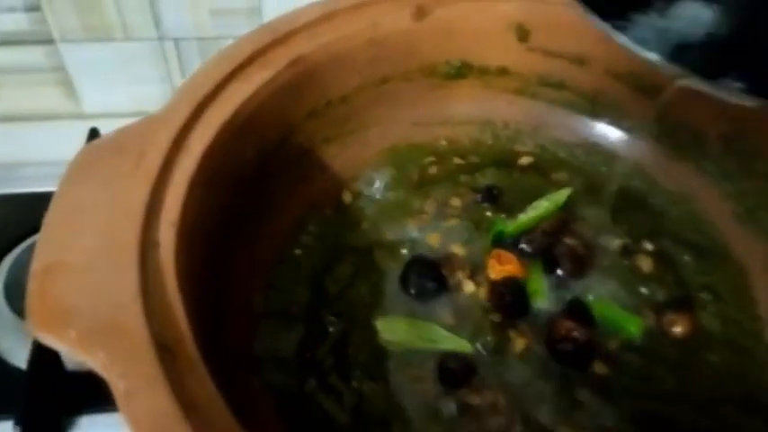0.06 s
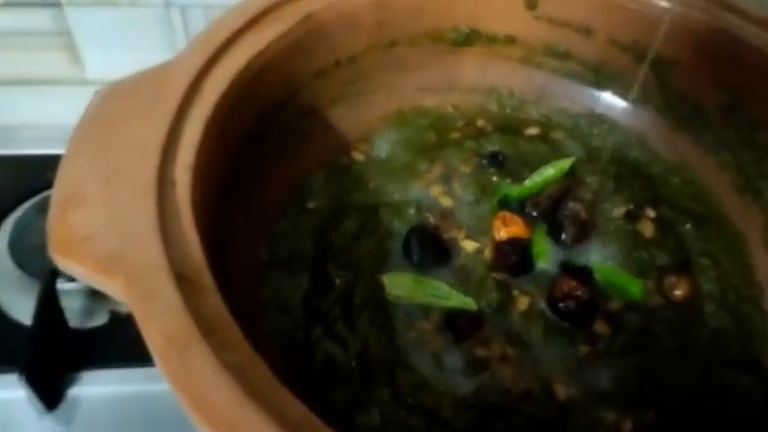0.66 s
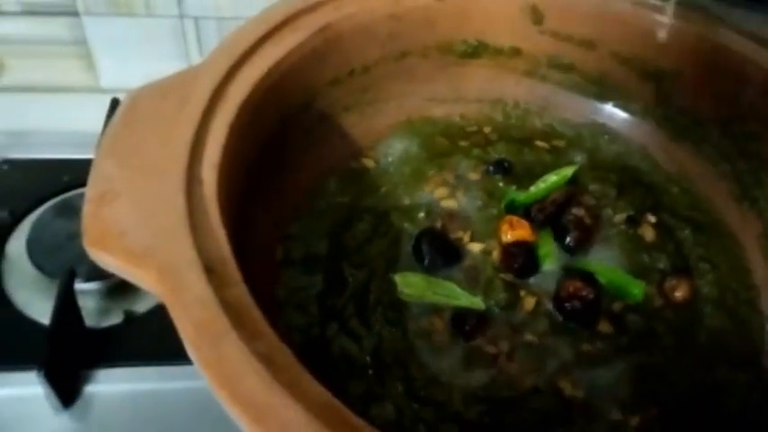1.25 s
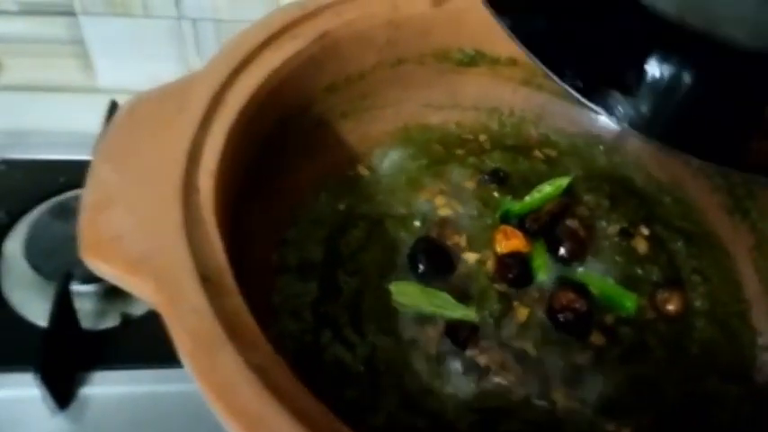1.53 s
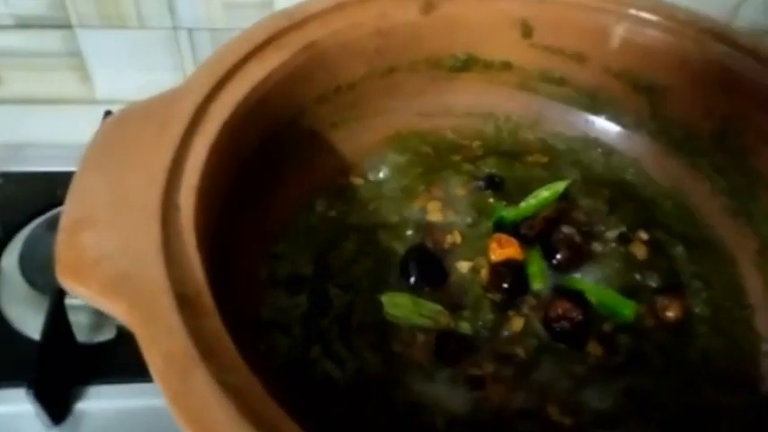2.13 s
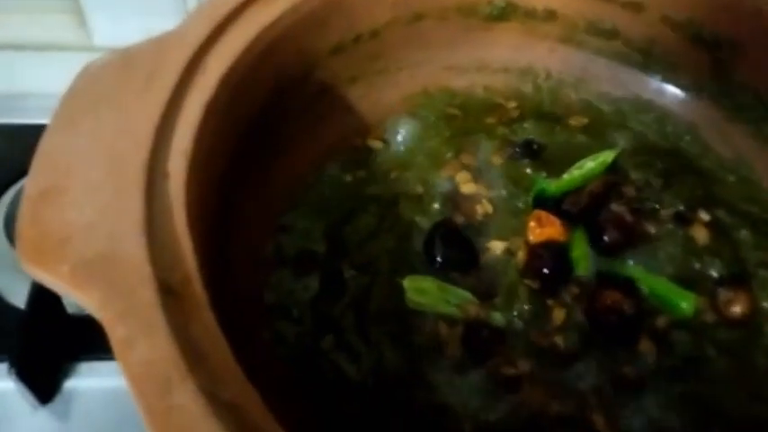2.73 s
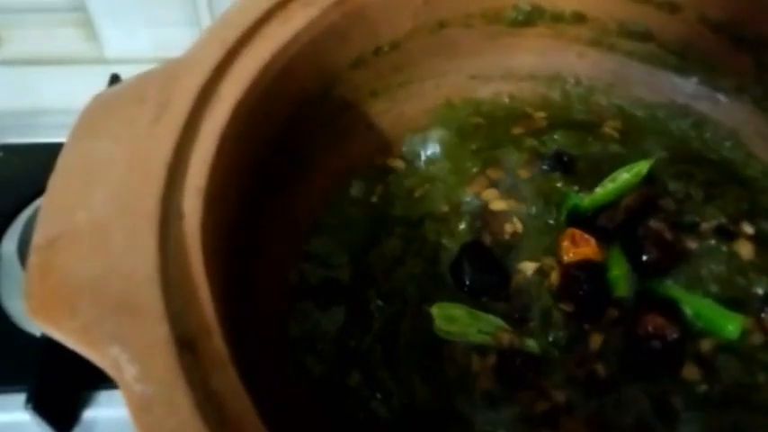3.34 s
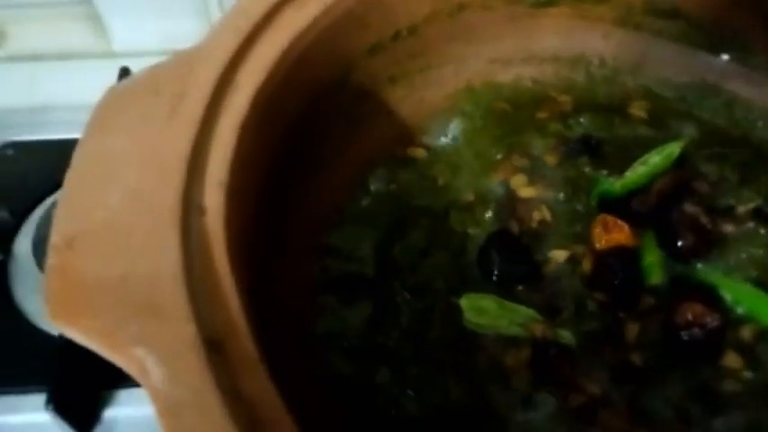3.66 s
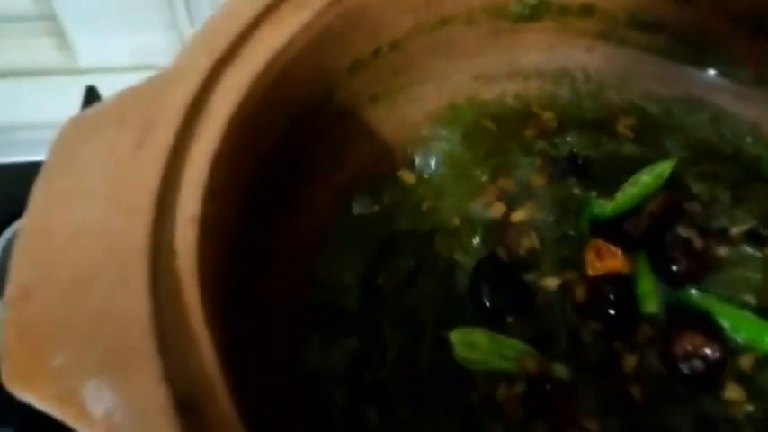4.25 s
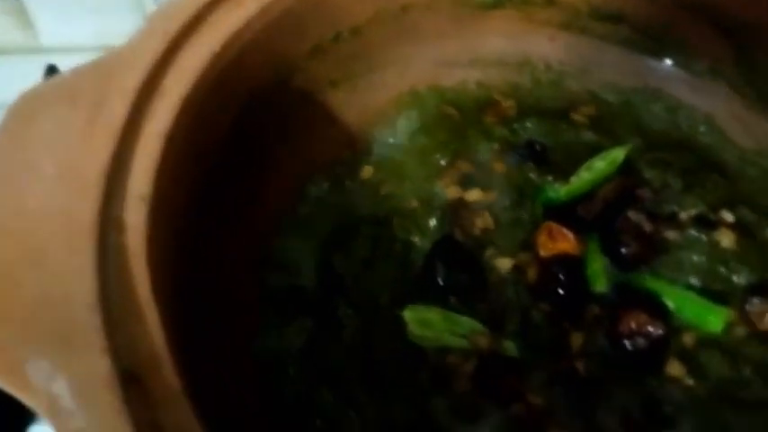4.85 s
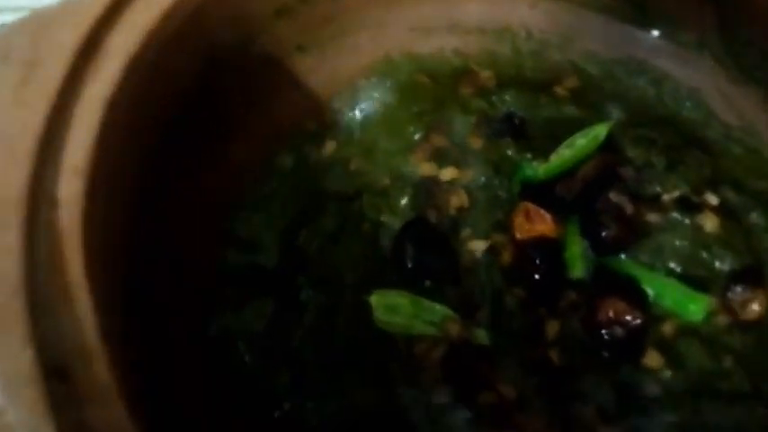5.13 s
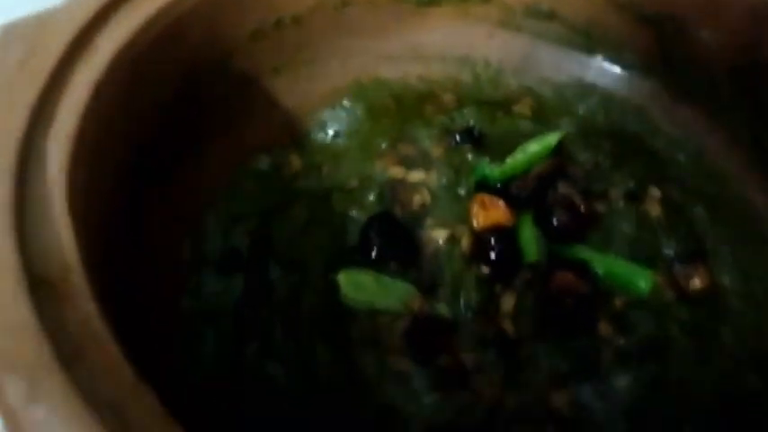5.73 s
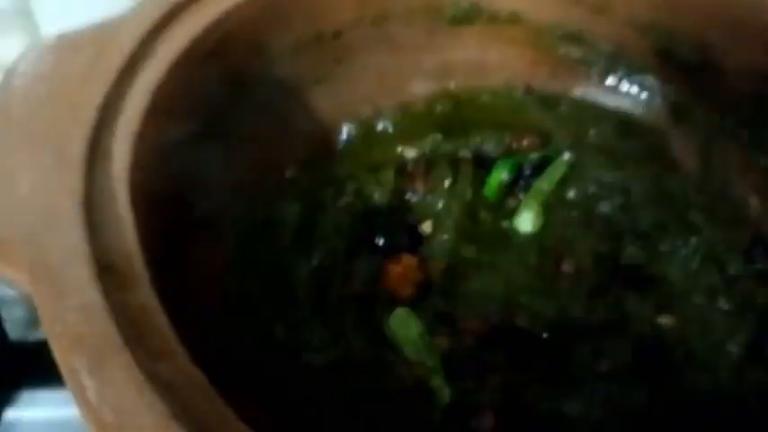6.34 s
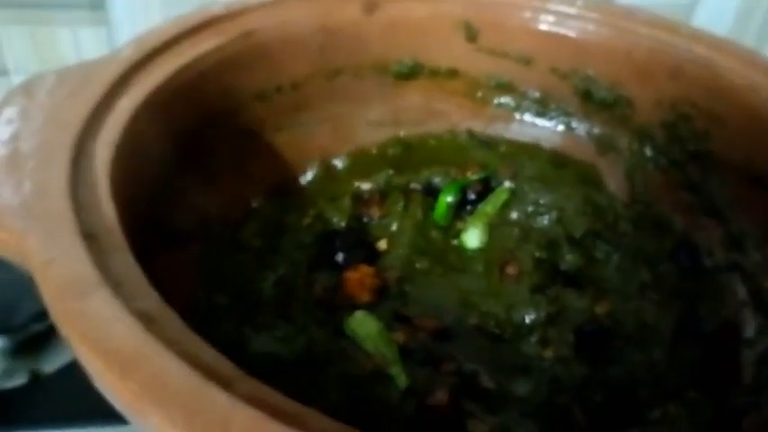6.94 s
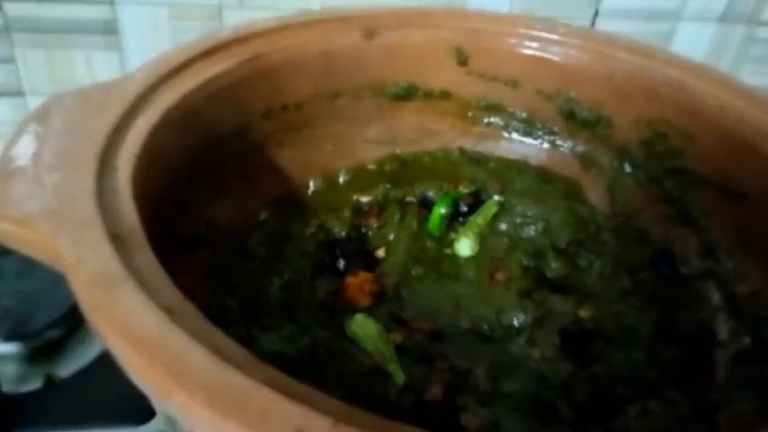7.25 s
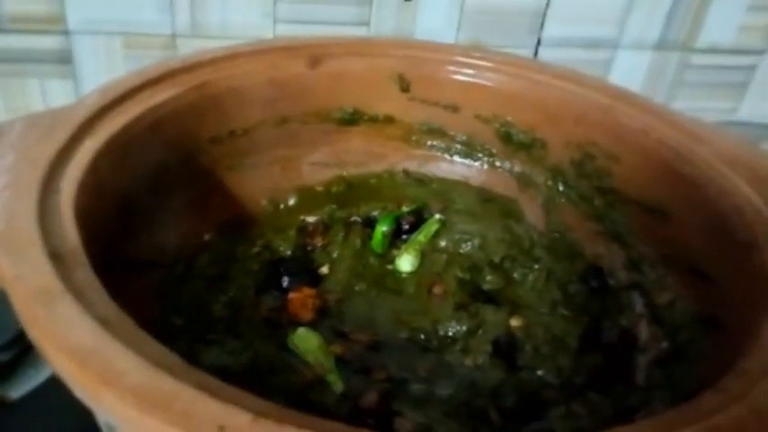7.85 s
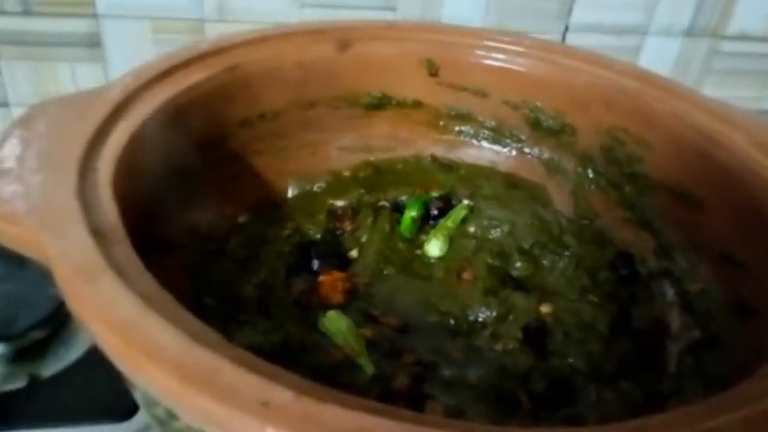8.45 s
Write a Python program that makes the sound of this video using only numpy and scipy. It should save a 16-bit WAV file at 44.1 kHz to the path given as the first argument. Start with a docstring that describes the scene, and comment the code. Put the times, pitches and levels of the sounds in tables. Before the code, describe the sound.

Hot oil sizzles on greens in a clay pot, with sharp spits and small popping bubbles, gradually weakening. About three seconds in, a metal pan clanks loudly onto the stove grate and rattles to rest. A sharp tap and a faint, brief creak follow. The sizzle then stops abruptly, leaving a few tiny pops over a low hum and faint electrical ticking, heard close in a small kitchen.

```python
"""A small, hard-walled kitchen with a steady hum and a faint electrical ticking.
Hot spiced oil, just poured on greens in a clay pot, sizzles as water flashes to steam: bubbles ring
and pop, drops spit, and all weaken as the oil cools. The emptied pan is set down on the stove, where
impacts excite its modes as it rocks; something small taps, and the pan creaks by stick-slip friction.
The sizzle stops abruptly, leaving lone bubbles and spits over the hum and the ticking."""
import sys
import numpy as np
from scipy import signal
from scipy.fft import rfft, irfft
from scipy.io import wavfile
from scipy.ndimage import uniform_filter1d

SR = 44100
rng = np.random.default_rng(int(sys.argv[2]) if len(sys.argv) > 2 else 0)


def store_pcm(level_fs):
    """Save levels as 16-bit WAV."""
    pcm = np.round(np.clip(level_fs, -1, 1) * 32767).astype(np.int16)
    wavfile.write(sys.argv[1], SR, np.atleast_2d(pcm).T)


N = 383669
TIME = np.arange(N) / SR
SIZZLE_END_S = 6.372


def undb(db):
    """Decibels to amplitude ratio."""
    return 10 ** (np.asarray(db) / 20)


def unit(x):
    """Normalise to rms 1."""
    return x / np.sqrt(np.mean(x ** 2))


def peak(x):
    """Normalise to peak 1."""
    return x / np.abs(x).max()


def add(out, s, sound):
    """Superpose a sound, starting at s seconds."""
    i = int(s * SR)
    out[i:i + len(sound)] += sound[:N - i]


def colour(x, points, size=8192):
    """Minimum-phase filter through (Hz, dB) points, by folding the cepstrum."""
    hz, db = np.transpose(points)
    bin_hz = np.arange(size // 2 + 1) * SR / size
    log_gain = np.log(undb(np.interp(np.log(bin_hz + 1), np.log(hz), db)))
    cepstrum = irfft(log_gain)
    cepstrum[1:size // 2] *= 2
    cepstrum[size // 2 + 1:] = 0
    return signal.oaconvolve(x, irfft(np.exp(rfft(cepstrum))))[:len(x)]


def band(x, hz, width):
    """Second-order resonator with gain 1 at its centre."""
    return signal.lfilter(*signal.iirpeak(hz, hz / min(width, SR / 4), fs=SR), x)


def walk(rate):
    """Random modulation: ramps between values drawn at a rate per second; rms 1."""
    hold = max(int(SR / rate), 1)
    steps = np.repeat(rng.standard_normal(N // hold + 1), hold)
    return unit(uniform_filter1d(steps, hold)[:N])


def clicks(rate, spread_db):
    """Shot noise: random impulses of unequal size at a rate per second; rms 1 however sparse."""
    chance = np.clip(rate / SR, 1 / SR, 1)
    sizes = undb(spread_db * np.clip(rng.standard_normal(N), -2.5, 2.5))
    return unit((rng.random(N) < chance) * sizes * rng.choice([-1, 1], N) / np.sqrt(chance))


def burst(t, t60):
    """Exponentially damped noise, falling 60 dB in t60 seconds."""
    return rng.standard_normal(len(t)) * undb(-60 * t / t60)


def chance_events(rate, length_s):
    """Jittered events. Each row: start in seconds, then size and pitch deviations of variance 1."""
    draws = rng.random((int(rate * length_s), 3))
    starts = (np.arange(len(draws)) + draws[:, 0]) / rate
    return np.column_stack([starts, np.sqrt(12) * (draws[:, 1:] - .5)])


def room(x, wet_db, early_db, late_t60=.56, early_t60=.04):
    """Reverberation: early reflections from pot and tiles, then the kitchen's diffuse tail."""
    t = TIME[:int(.8 * SR)]
    late, early = rng.standard_normal((2, len(t))) * (t > .0015)
    late *= undb(-60 * t / late_t60) * np.minimum(t / .015, 1)
    late = colour(late, [(300, -4.5), (5000, -3), (14000, -3)])
    early *= undb(-60 * t / early_t60)
    response = (undb(wet_db) * unit(late) + undb(early_db) * unit(early)) / np.sqrt(len(t))
    return x + signal.oaconvolve(x, response)[:N]


# Spectrum of the room noise. Each row: frequency in Hz, relative level in dB.
AMBIENT_SPECTRUM = [(20, -1), (70, -5), (160, -14), (290, -15), (350, -18.5), (500, -10), (650, -21.5),
                    (1000, -21), (2200, -27.5), (2900, -25.5), (4500, -30.5), (9500, -34.5), (15500, -35.5)]
# Tones of the hum. Each row: mean frequency in Hz, mean rms level in dB.
HUM_TONES = [(97, -69), (145, -71.5), (474, -72.5), (576, -73)]


def kitchen():
    """Ambient noise, with a hum that wavers by random frequency and amplitude modulation."""
    out = unit(colour(rng.standard_normal(N), AMBIENT_SPECTRUM)) * undb(-57 + .5 * walk(5))
    for hz, db in HUM_TONES:
        gain = undb(db + 2 * walk(6))
        phase = 2 * np.pi * np.cumsum(hz * (1 + .00617 * walk(11))) / SR
        out += gain * unit(np.sin(phase))
    return out


def draught(gust_s=4.3, half_width_s=.31):
    """Turbulent pressure of air nudging the microphone: a low rumble with one gust."""
    rumble = unit(colour(rng.standard_normal(N), [(12, .5), (35, -5), (70, -24.5), (300, -61.5)]))
    gust = np.exp(-((TIME - gust_s) / half_width_s) ** 2)
    return rumble * undb(-56.5 + 11.5 * gust + 2 * walk(2.99))


def ticking(period_s=1 / 30):
    """Electrical pickup: a pulse train of spikes with a high fizz, and weaker spikes midway."""
    out = np.zeros(N)
    spike = peak(signal.windows.hann(5))
    for s in np.arange(.0188, N / SR - period_s, period_s):
        fizz = unit(band(rng.standard_normal(SR // 1000), hz=11000, width=3000))
        add(out, s, undb(-41.5) * spike)
        add(out, s, undb(-55) * fizz)
        add(out, s + period_s / 2, undb(-52.5) * spike)
    return out


# A utensil's impact: start in seconds, peak level in dB.
TAP_IMPACT = (4.1548, -13)
# Spectrum of the impact. Each row: frequency in Hz, relative level in dB.
TAP_SPECTRUM = [(100, -4), (300, 3), (550, -5), (800, -1), (1000, -7), (1400, 2.5), (2400, -8), (4200, -5),
                (5800, -3), (8500, -9), (12000, -9), (15500, -15)]


def tap():
    """Heavily damped impact: something small and hard is put down, and the room answers."""
    out = np.zeros(N)
    s, db = TAP_IMPACT
    add(out, s, undb(db) * peak(colour(burst(TIME[:SR // 10], t60=.046), TAP_SPECTRUM)))
    return room(out, wet_db=-4.5, early_db=-5)


# The pan's slide on the grate: start in seconds, slips per second, peak level in dB.
PAN_SLIDE = (4.9875, 306, -33)


def creak():
    """Stick-slip friction: the pan moves on the grate in a few uneven jerks that soon die out."""
    out, t = np.zeros(N), TIME[:SR // 10]
    s, rate, db = PAN_SLIDE
    cycles = np.cumsum(rate * (1 + .05 * walk(300)[:len(t)])) / SR
    slips = np.diff(np.floor(cycles), prepend=-1) + .067 * rng.standard_normal(len(t))
    slips *= np.exp(-(t / .024) ** 2)
    body = [(150, -27), (300, 5), (430, -11), (600, -.5), (1200, -6), (2500, -27), (6000, -45)]
    add(out, s, undb(db) * peak(colour(slips, body)))
    return room(out, wet_db=-8, early_db=-12)


def ring(modes, t):
    """Modal superposition: damped sinusoids, successive pairs in opposite phase; peak 1."""
    return peak(sum((-1) ** (k // 2) * undb(db - 60 * t / t60) * np.sin(2 * np.pi * hz * t)
                    for k, (hz, db, t60) in enumerate(modes)))


# Impacts of pan on grate. Each row: start in seconds, ring level in dB, clank level in dB,
# treble tilt of the clank in dB per octave.
PAN_IMPACTS = [(3.1302, -3.5, -5.5, -2.5), (3.319, -42, -15, 3), (3.352, -42.5, -21, 2.5),
               (3.373, -18.5, -17, -16), (3.391, -22.5, -25, -15), (3.4437, -28, -4, 0.5),
               (3.45, -21.5, -15, 0.5), (3.463, -20.5, -12, 2), (3.572, -42, -13, -0.5),
               (3.641, -48, -20.5, 0.5), (3.685, -59, -21, -2)]
# Modes of pan and grate. Each row: frequency in Hz, relative level in dB, 60 dB decay time in seconds.
PAN_MODES = [(540, -19, .07), (715, -20, .08), (850, -25, .05), (1063, -19, .15), (1114, -21, .15),
             (1293, 0, .115), (1297, -18, .35), (1491, -26, .2), (1783, -30, .15), (2420, -27, .33),
             (2492, -29, .1), (3490, -37, .15)]
GRATE_MODES = [(531, -18, 0.12), (1392, -10, .09), (1590, 1, .06), (1685, -4.5, 0.086), (1904, -6.5, .09),
               (1953, -6.5, .11), (2100, -7, .11), (2300, -9.5, 0.11), (3224, -10.5, 0.11),
               (3760, -15.5, 0.095), (4810, -14.5, .05), (5230, -18, .06), (6390, -24, 0.0599),
               (7300, -23, .05)]
# Spectrum of the crack of contact. Each row: frequency in Hz, relative level in dB.
CONTACT_SPECTRUM = [(60, -13), (240, -14), (330, -13), (550, -4), (700, -8.5), (900, -13.5), (1500, 6.5),
                    (2100, -0.5), (2900, -8), (4300, -12.5), (5200, -10), (8000, -20.5), (15000, -32.5)]


def pan():
    """Free vibration after impact: pan and grate ring as the pan lands, tips and rocks to rest."""
    out, t = np.zeros(N), TIME[:SR // 2]
    for s, ring_db, clank_db, tilt in PAN_IMPACTS:
        crack = peak(colour(burst(t, t60=.041), CONTACT_SPECTRUM))
        # harder contact tips the clank towards the treble
        clank = colour(ring(GRATE_MODES, t) + crack, [(1500, .0096), (12000, 3 * tilt)])
        add(out, s, undb(ring_db) * ring(PAN_MODES, t) + undb(clank_db) * peak(clank))
    return room(out, wet_db=-5.5, early_db=-17)


def stove(t60=1.0):
    """Plate vibration: each landing feeds energy to the sheet-metal top, which booms dully."""
    energy = np.zeros(N)
    for s, _, clank_db, _ in PAN_IMPACTS:
        add(energy, s, undb(clank_db - 60 * TIME[:SR] / t60) ** 2)
    plate = [(40, -11), (65, 0), (83, 3.5), (120, -8.5), (168, 1.5), (240, -16.5), (330, .5),
             (700, -32), (2000, -58.5)]
    return undb(-33.5) * np.sqrt(energy) * unit(colour(rng.standard_normal(N), plate))


def bubble(hz, cycles, glide):
    """Bubble resonance: a damped oscillation whose pitch rises by the fraction glide as it bursts."""
    age = np.arange(int(cycles * SR / hz) + 2) * hz / SR / cycles
    return np.sin(2 * np.pi * cycles * age * (1 + glide * age / 2)) * undb(-60 * age)


def froth(count, hz, octaves, cycles, spread_db):
    """Incoherent sum of many bubbles of scattered pitch and size; rms 1."""
    out = np.zeros(N)
    for when, pitch, size, life in rng.random((count, 4)):
        tone = bubble(hz * 2 ** (octaves * (2 * pitch - 1)), cycles * (.5 + life), glide=.1497)
        add(out, when * N / SR, undb(spread_db * size ** 2) * tone)
    return unit(out)


def faint_bubbles():
    """Masking: faint bubbles ring throughout, covered while the sizzle lasts."""
    bubbles = froth(count=480, hz=2603, octaves=.85, cycles=24, spread_db=10.5)
    return room(undb(-73) * bubbles, wet_db=-3.5, early_db=-2)


# The sharpest spits of oil. Each row: start in seconds, peak level in dB, centre frequency in Hz.
SHARP_SPITS = [(0.5517, -8.5, 2600), (1.1142, -18, 11000), (4.278, -26.5, 9000), (4.8058, -27.5, 1640),
               (4.838, -27, 6500), (6.31, -33.5, 10000), (7.272, -43, 2700), (8.253, -45, 5040),
               (8.369, -39.5, 5530)]


def spits(droplets_per_s=4, fall_db_per_s=1.6):
    """Explosive boiling: water drops snap in the oil; the big ones also thump the air in the pot."""
    out, t = np.zeros(N), TIME[:SR // 20]
    droplets = [(s, -24 - fall_db_per_s * s + 2.5 * size, 11000)
                for s, size, _ in chance_events(droplets_per_s, SIZZLE_END_S)]
    for s, db, hz in SHARP_SPITS + droplets:
        blast = burst(t, t60=.008)
        snap = peak(band(band(blast, hz, width=hz), hz, width=hz))
        thump = peak(band(blast, hz=540, width=220))
        add(out, s, undb(db) * peak(snap + undb(db - 4) * thump))
    return room(out, wet_db=-5, early_db=-8)


# The largest bubbles. Each row: start in seconds, peak level in dB, initial pitch in Hz.
LARGE_BUBBLES = [(0.1173, -17, 2740), (0.4748, -20, 2760), (1.6768, -21, 2800), (3.7557, -21.5, 2560),
                 (3.8583, -22, 2410), (4.5132, -24, 2440), (4.5893, -23, 2970), (4.6349, -27, 3060),
                 (5.5817, -33, 2400), (5.867, -31, 3160), (6.4053, -41, 3100), (6.795, -43.5, 2550),
                 (7.034, -41, 4130), (7.717, -46.5, 2740), (7.855, -46, 1510), (8.517, -44, 4200),
                 (8.565, -40.5, 2760)]


def pops(lesser_per_s=5, fall_db_per_s=2.6):
    """Bursting bubbles resonate with a short plip; the lesser ones weaken as the oil cools."""
    out, t = np.zeros(N), TIME[:SR // 20]
    lesser = []
    for s, size, pitch in chance_events(lesser_per_s, N / SR):
        db = -25 - fall_db_per_s * s if s < SIZZLE_END_S else -51
        lesser.append((s, db + 3 * size, 2550 * 2 ** (.17 * pitch)))
    for s, db, hz in LARGE_BUBBLES + lesser:
        # the torn film flutters on around the bubble's pitch
        flutter = band(rng.standard_normal(len(t)), hz, width=.22 * hz) * undb(-60 * t / .06)
        plip = undb(-8.5) * peak(flutter)
        add(plip, 0, bubble(hz, cycles=26, glide=.1))
        add(out, s, undb(db) * peak(plip))
    return room(out, wet_db=-5.5, early_db=-8)


# Spectrum of the simmering greens. Each row: frequency in Hz, relative level in dB.
SIMMER_SPECTRUM = [(90, -11.5), (155, 4), (230, -12), (310, 1), (420, -5.5), (560, 3.5), (680, -7),
                   (1050, -2.5), (1500, -9.5), (2500, -19), (6000, -43.5)]


def greens(start_s=2, rise_s=2):
    """Low-frequency shot noise: the greens mutter louder as the oil sinks in."""
    soaked = np.clip((TIME - start_s) / rise_s, 0, 1)
    mutter = unit(colour(clicks(450.2, spread_db=6), SIMMER_SPECTRUM))
    return undb(-66 + 9.5 * soaked) * mutter


# Spectra of the frying and of its finest spray. Each row: frequency in Hz, relative level in dB.
FRY_SPECTRUM = [(200, -39), (380, -22.5), (750, -16.5), (1100, -14), (1600, -8), (2200, -6.5), (2750, -2),
                (3450, -5.5), (4000, -3), (4600, -5.5), (5400, -5.5), (7000, -8.5), (9000, -17),
                (15000, -36)]
SPRAY_SPECTRUM = [(2000, -30), (6000, -9), (8300, -2.5), (10500, -0.5), (13500, -4.5), (15800, -8)]
# Cavity resonances of the pot. Each row: frequency in Hz, bandwidth in Hz, initial gain in dB.
POT_RESONANCES = [(503, 28, 19), (555, 29, 14), (751.4, 61, -3)]


def sizzle(fry_fall_db_per_s=3, spray_fall_db_per_s=2.75):
    """Flash boiling: water bursts to steam as shot noise, sparser and weaker as the oil cools."""
    cooled_db = fry_fall_db_per_s * TIME
    activity = undb(-1.1 * cooled_db)
    fry = colour(clicks(12000 * activity, spread_db=4), FRY_SPECTRUM)
    # the first fierce frying sets the air in the pot humming
    pot_air = sum(undb(db) * band(fry, hz, width) for hz, width, db in POT_RESONANCES)
    fry = unit(fry + undb(-.5 * cooled_db) * pot_air)
    surge_db = .6 * walk(10)
    fry *= undb(-.81 + surge_db + .53 * walk(50))
    # the finest spray comes in little spurts
    spray = unit(colour(clicks(14000 * activity, spread_db=3), SPRAY_SPECTRUM))
    spray *= undb(surge_db + (.5 + .062 * cooled_db) * walk(60) + .05 * cooled_db * walk(12))
    # in cooler oil, separate bubbles gain on the hiss
    foam = froth(count=2400, hz=2700, octaves=.28, cycles=22, spread_db=16)
    foam *= undb(-8.5 + .14 * cooled_db + (1 + .14 * cooled_db) * walk(20))
    return undb(-32 - cooled_db) * (fry + foam) + undb(-37.6 - spray_fall_db_per_s * TIME) * spray


def scene():
    """Superposition in one channel: sizzle and simmer stop dead while the kitchen carries on."""
    cooking = room(sizzle() + greens(), wet_db=-12, early_db=-12.5) * (TIME < SIZZLE_END_S)
    pot = cooking + faint_bubbles() + pops() + spits()
    cookware = pan() + stove() + tap() + creak()
    background = kitchen() + draught() + ticking()
    return (pot + cookware + background)[None]


def record(dry, top_hz=15700):
    """Hard clipping at full scale, then band limiting by a steep low-pass filter."""
    lowpass = signal.ellip(10, .2, 80, top_hz, fs=SR, output="sos")
    return signal.sosfilt(lowpass, np.clip(dry, -1, 1))


dry = scene()
out = record(dry)
store_pcm(out)
```